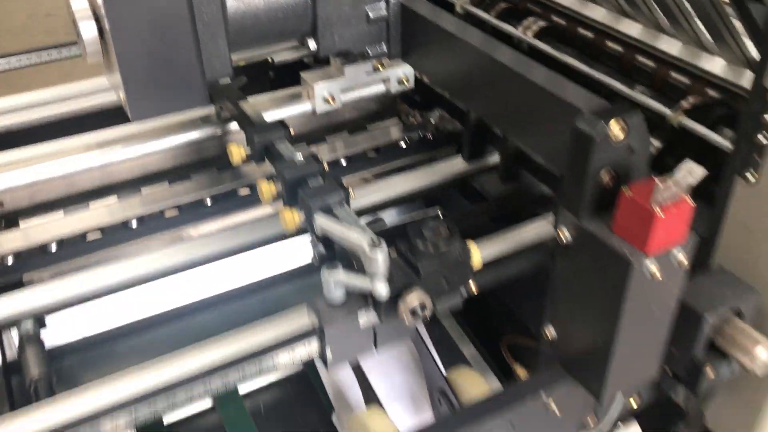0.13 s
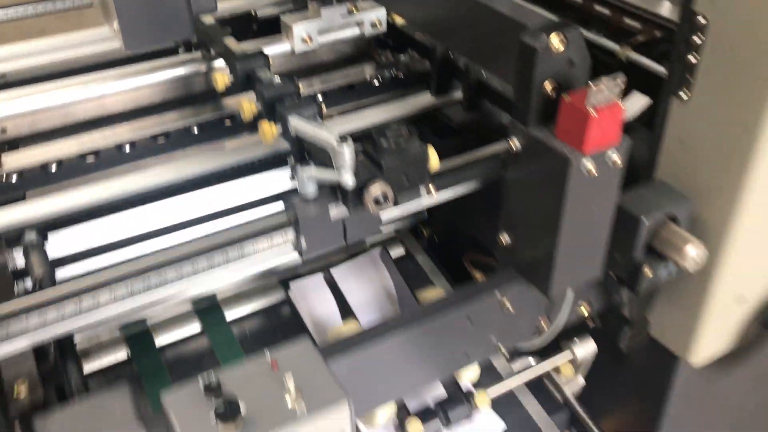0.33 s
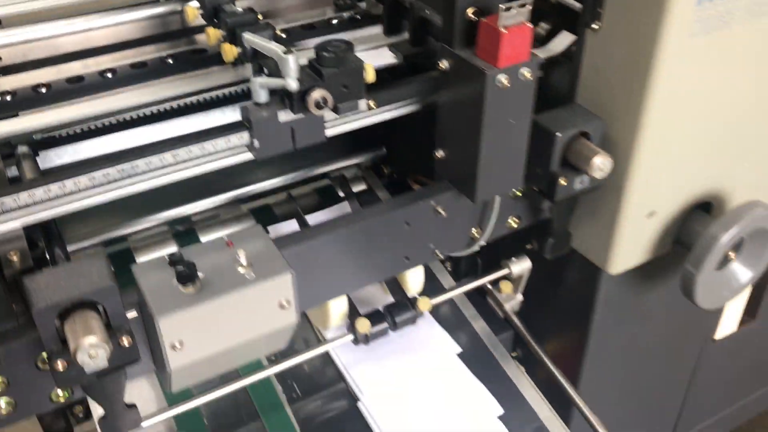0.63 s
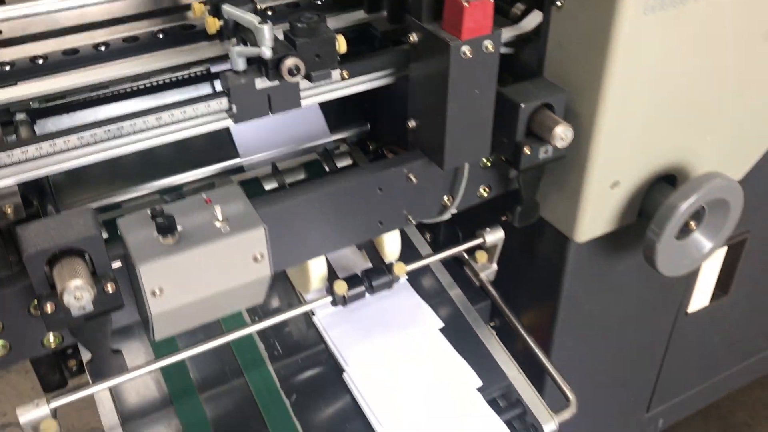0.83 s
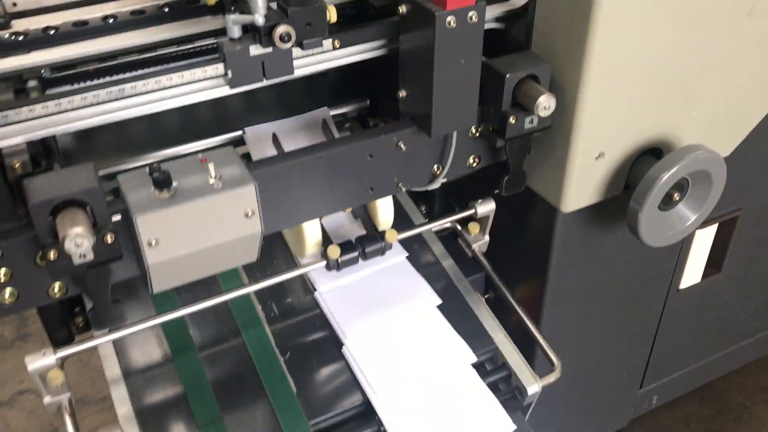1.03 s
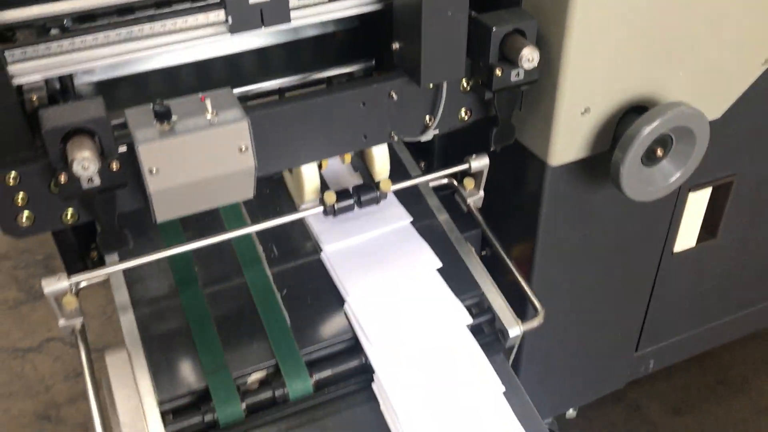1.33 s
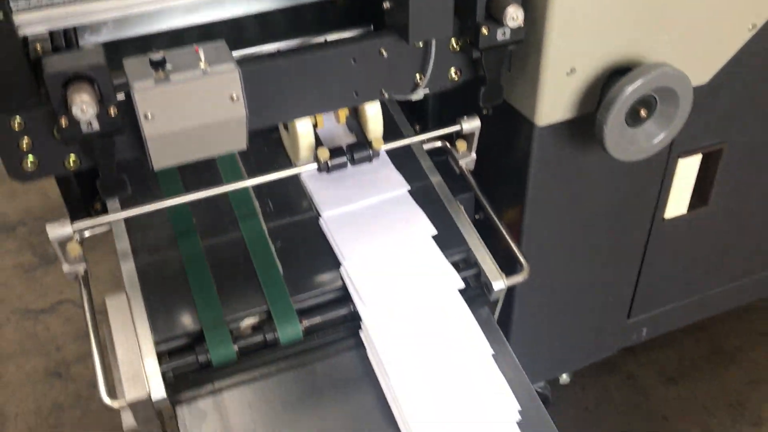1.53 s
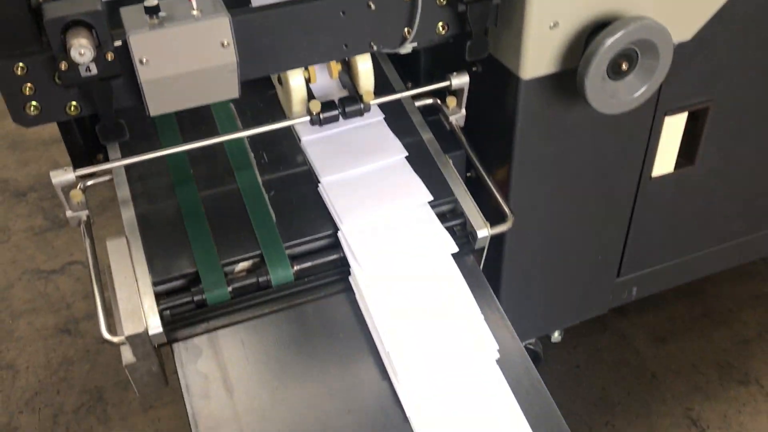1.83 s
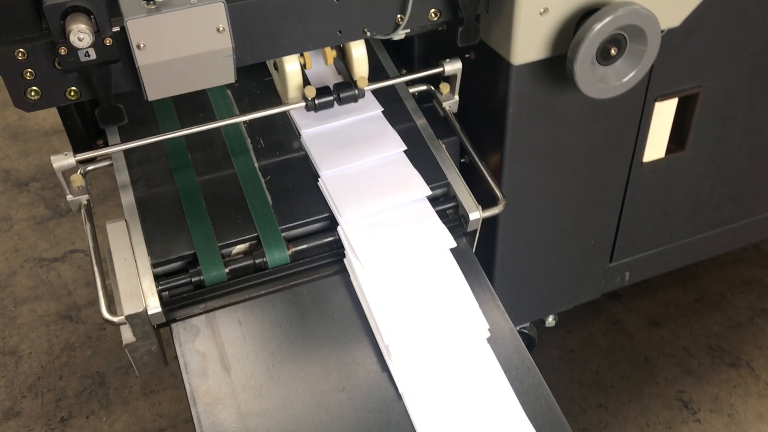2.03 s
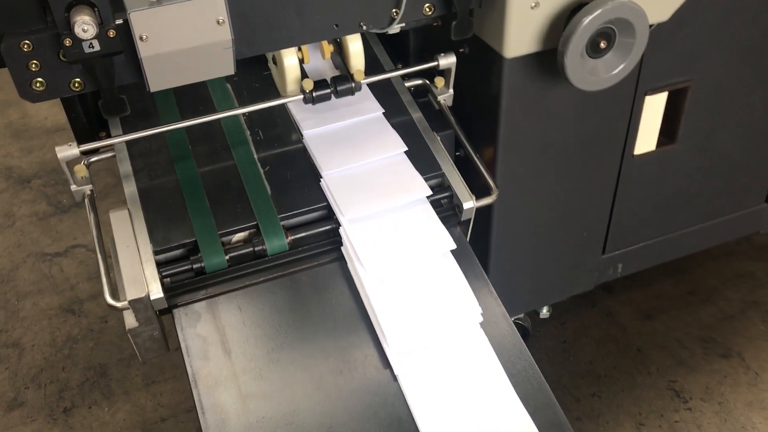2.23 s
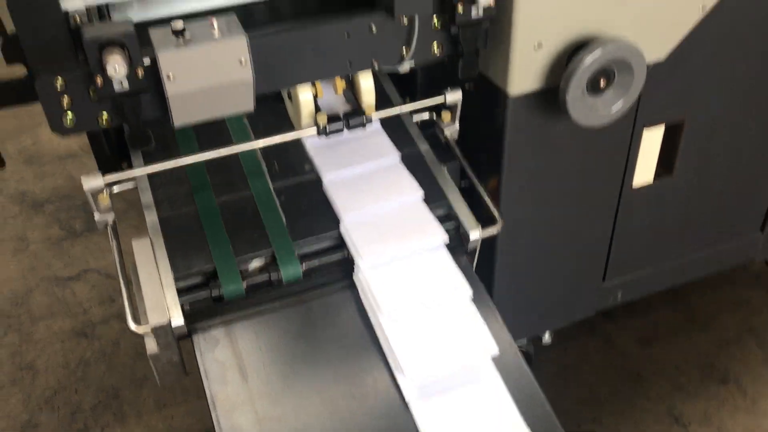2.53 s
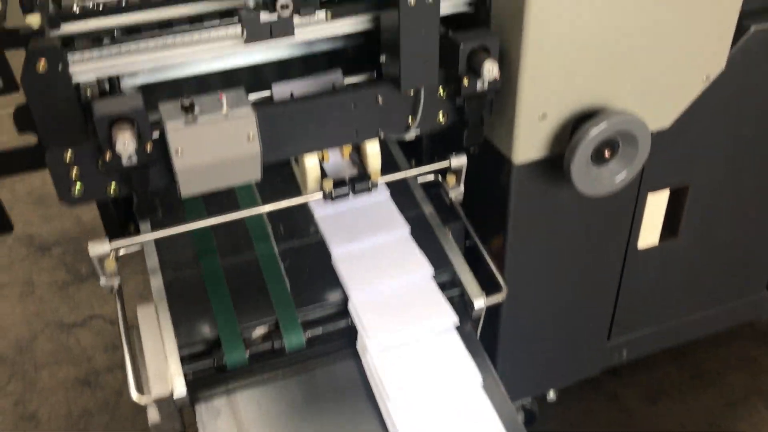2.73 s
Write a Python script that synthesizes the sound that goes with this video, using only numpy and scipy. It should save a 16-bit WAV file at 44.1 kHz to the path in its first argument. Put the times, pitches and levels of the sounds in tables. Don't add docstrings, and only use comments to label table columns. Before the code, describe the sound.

Close whir of a paper folding machine with rhythmic hard knocks, paper slaps and bright metal rattles.

```python
import sys
import numpy as np
from scipy import signal
from scipy.fft import rfft, irfft, next_fast_len
from scipy.io import wavfile
from scipy.ndimage import map_coordinates

SR = 44100
rng = np.random.default_rng(int(sys.argv[2]) if len(sys.argv) > 2 else 0)


def master(y):
    cut = np.clip(np.atleast_2d(y).T, -1, 1)
    pcm = np.round(cut * 32767)
    wavfile.write(sys.argv[1], SR, pcm.astype(np.int16))


def volts_from_db(level):
    exponent = np.asarray(level, float) / 20
    return 10 ** exponent


N = 127449
T = np.arange(N) / SR
CYCLE_S = 0.875
GRAIN_DB = 2.74

# (frequency [Hz], level [dB per Hz])
MOTOR_SPECTRUM = [(18, -51), (30, -19), (97, -4.5), (205, -1), (234, -8.5), (301, 1.5), (465, -11),
                  (510, -3.5), (700, -39), (910, -26), (1540, -120)]
# (frequency [Hz], level [dB per Hz])
ROLLER_SPECTRUM = [(600, -5.5), (900, -4.5), (1250, -7), (1600, -8), (2100, -9), (3000, -9), (5000, -14)]
# (frequency [Hz], level [dB per Hz])
AIR_SPECTRUM = [(4500, -19), (5300, 0), (6300, 3.5), (9000, 1.5), (10500, 1), (12000, 1), (14500, 1),
                (16000, -4)]
# (time [s], rollers [dB], air [dB])
RUNNING_LEVELS = [
    (0, -33, -38.5),
    (1, -35.5, -39.5),
    (2.89, -36.5, -38),
]
# (frequency [Hz], rms level [dB])
GEAR_TONES = [(333.8, -52.5), (500.6, -48.5), (532.9, -46.5), (646.0, -56.5), (802.1, -57.5), (1120, -48),
              (1206, -50), (2046, -52)]
# (time [s], level [dB], frequency [Hz])
FRAME_THUDS = [(.01, -26, 180.8), (.03, -31.5, 123.7), (.25, -34, 120.8), (.35, -24, 175),
               (.55, -24, 175.5), (.58, -26.5, 105), (.85, -29.5, 107.9), (1.27, -27.5, 176.7),
               (1.43, -27, 172.4), (1.74, -26.5, 178), (.61, -28.5, 170.7), (2.66, -30.5, 300),
               (1.499, -29.5, 108), (2.15, -35, 173), (2.33, -25.5, 175), (2.62, -28, 110)]
# (time [s], level [dB], frequency [Hz], t60 [s])
METAL_TAPS = [(.0186, -8, 3430, 0.012), (.0445, -12, 2010, 0.017), (.043, -16, 6800, .015),
              (.332, -15, 1610, .03), (0.331, -11.5, 3300, .03), (0.375, -15.5, 1490, .03),
              (0.45, -12.5, 1183, 0.032), (0.452, -15, 2360, 0.033), (.452, -14, 3000, 0.031),
              (.54, -20.5, 1785, 0.049), (.647, -22.5, 4340, .05), (.647, -19, 7440, 0.053),
              (.677, -19, 11300, .02), (0.707, -27, 4200, .12), (0.741, -19, 8310, 0.085),
              (.752, -24.5, 4200, 0.097), (0.7756, -15, 4460, 0.018), (.851, -18, 3980, .04),
              (0.8998, -11.5, 1480, 0.013), (.923, -15.5, 2200, .035), (.923, -15.5, 3760, .025),
              (1.213, -20, 2450, 0.026), (1.212, -15.5, 3480, .025), (1.256, -17, 1536, 0.029),
              (1.332, -12, 1230, 0.032), (1.332, -19, 2060, .03), (1.334, -14.5, 2565, 0.031),
              (1.532, -23, 7270, .04), (1.655, -16, 4000, 0.014), (1.66, -14, 4650, .012),
              (1.659, -17, 6600, .012), (1.779, -8, 1453, .015), (1.7797, -12, 3130, 0.013),
              (1.804, -16.5, 900, 0.049), (2.089, -14, 2595, 0.034), (2.09, -16, 3200, .025),
              (2.21, -9.5, 1180, 0.024), (2.431, -20, 11300, 0.022), (2.53, -22, 3920, .015),
              (2.533, -22, 5600, .015), (2.5953, -8, 3180, .012), (2.607, -21, 654, 0.056),
              (2.656, -11, 3270, 0.016), (.6965, -17, 8979, .06), (0.6974, -17, 8050, .05),
              (0.742, -19, 5319, 0.038), (.921, -13.5, 12700, .015), (1.722, -15, 14500, 0.014),
              (2.677, -16, 12500, .015), (.7425, -16.5, 7170, .06)]
# (time [s], level [dB], rise [s], fall [s])
SHEET_RUSTLES = [
    (.630, -26, .001, .004),
    (0.638, -11, 0.0085, 0.0095),
    (.676, -23, 0.0006, 0.019),
    (1.521, -18.5, .008, 0.011),
    (1.557, -26, .003, 0.0087),
    (1.668, -18.5, 0.0006, 0.01),
    (2.398, -20.5, 0.0088, 0.012),
    (2.542, -19, .004, 0.012),
]
# (time [s], low mode [dB], high mode [dB], bracket [dB])
PIN_STRIKES = [
    (0.0005, -28, -40, -35),
    (0.8415, -38, -32, -26),
    (0.852, -14, -25, -16.5),
    (0.8589, -17, -7, -17.5),
    (1.7235, -48, -34, -47),
    (1.733, -13, -12, -16.5),
    (2.6065, -22, -15, -23),
]
# (frequency [Hz], t60 [s])
PIN_MODES = [(11858, 0.086), (14450, 0.055)]
# (frequency [Hz], level [dB], t60 [s])
BRACKET_MODES = [(642, -3, .1), (2688, 0, .1), (5140, -8, .1), (7700, -8, .05)]
# (time [s], peak [dB], first favoured mode [Hz], second favoured mode [Hz], hiss [dB])
BAR_RATTLES = [(0.647, -12, 10068, 6165, -11), (0.696, -4, 7060, 10068, -8),
               (0.7416, -6.5, 11190, 10068, -8.5), (0.785, -10.5, 10068, 9265, -1),
               (1.524, -15, 8010, 8010, -13), (1.533, -10, 5280, 8010, -10), (1.5783, -7, 8980, 12440, -8),
               (1.6228, -15, 10068, 8980, -5), (2.413, -16.5, 8010, 6165, -11),
               (2.433, -15, 12440, 11190, -10), (2.4527, -5.5, 10068, 8980, -18),
               (2.454, -5.5, 7060, 12440, -19), (2.4976, -10, 10068, 8980, -9.5)]
# (frequency [Hz], level [dB], t60 [s])
BAR_MODES = [(4180, -16, .09), (5280, -15, .1), (6165, -9, .04), (7060, -9, .085), (8010, -3, .055),
             (8340, -9, .06), (8980, -1, .07), (9265, -7, .08), (10068, 0, .062), (11190, 0, .04),
             (12440, -2, .042), (13570, -3, .035), (14400, -3, .035)]
# (time [s], peak [dB], snap [dB], lowest resonance [dB])
KNIFE_KNOCKS = [
    (0.0189, -6, -10, -6),
    (0.8405, -1.5, -22, 0),
    (0.9, -18, -2, -5),
    (1.7221, -5, -12, 4.5),
    (1.7800, -6, -17, -19),
    (2.5956, -3.5, -22, 1.5),
    (2.6558, -12, -14, -9),
]
# (frequency [Hz], width [Hz], level [dB])
KNIFE_MODES = [(1060, 168, 1), (1530, 130, 1), (2770, 890, 7), (3200, 470, 7)]
# (time [s], peak [dB], low part [dB], bright part [dB])
PAPER_SLAPS = [(0.0024, -12.5, -18, -4), (0.0106, -21, -13, -12), (0.042, -7, -11.5, -5.5),
               (0.1644, -34.5, 6, -5), (0.3312, -4.5, -15, -10.5), (0.3748, -15, -11, -25),
               (0.4494, -9, -8, -16), (0.5344, -30, 2.5, -22), (0.56, -24.5, 3.5, -25),
               (0.774, -21, -27, 6), (0.8514, -10.5, -12, 5), (0.883, -19, -24, 1.5),
               (0.922, -9.5, -9.5, -2.5), (1.2115, -6.5, -18, -7.5), (1.2553, -17.5, -10, -23),
               (1.329, -12.5, -5.5, -27), (1.416, -30.5, 5, -21), (1.6577, -25, -25, 9),
               (1.734, -9.5, -16, -1), (1.7703, -14.5, -20, -15), (1.8035, -16, -2, 3.5),
               (2.0895, -8.5, -13.5, -13), (2.132, -18.5, -10, -27), (2.2087, -14, -3.5, -14),
               (2.5313, -22.5, -44, 6), (2.605, -10.5, -13, -0.5), (2.641, -16.5, -36, -2),
               (2.677, -14.5, -8, 0.5)]
# (frequency [Hz], level [dB per Hz])
PAPER_BODY = [(1300, -4), (2000, 0), (3200, -2.5), (4500, -4.5), (7000, -11)]
# (frequency [Hz], level [dB per Hz])
PAPER_TOP = [(5000, -0.5), (7000, 2), (10500, -0.5), (12500, 2.5), (16000, -4)]
# (frequency [Hz], level [dB])
STOP_PLATES = [(760, -6), (1200, -1), (1460, -9), (1750, -8)]


def rms_one(x):
    return x / np.sqrt(np.mean(x ** 2) + 1e-20)


def coloured(x, spectrum):
    hz, db = np.transpose(spectrum)
    octave = np.log2(np.maximum(np.fft.rfftfreq(N, 1 / SR), 1))
    outside = np.maximum(np.log2(hz[0]) - octave, 0) + np.maximum(octave - np.log2(hz[-1]), 0)
    gain_db = np.interp(octave, np.log2(hz), db) - 24 * outside
    return rms_one(irfft(rfft(x) * volts_from_db(gain_db), N))


def drift(rate_hz):
    count = int(N / SR * 2 * rate_hz) + 3
    return map_coordinates(rng.standard_normal(count), [T * 2 * rate_hz], order=3)


def ring(strikes, hz, t60):
    r = volts_from_db(-60 / (t60 * SR))
    w = 2 * np.pi * hz / SR
    return signal.lfilter([0, np.sin(w)], [1, -2 * r * np.cos(w), r * r], strikes + 1e-18)


def clicks(s, db):
    out = np.zeros(N)
    out[(np.asarray(s) * SR).astype(int)] = volts_from_db(db)
    return out


def swell(s, db, rise, fall):
    t = np.maximum(T - np.asarray(s)[:, None], 0)
    rise, fall = (np.maximum(np.reshape(v, (-1, 1)), .0002) for v in (rise, fall))
    return volts_from_db(np.asarray(db)) @ ((1 - np.exp(-t / rise)) * np.exp(-t / fall))


def crackle():
    grain_db = GRAIN_DB * np.minimum(rng.exponential(1, N), 5)
    return rng.standard_normal(N) * volts_from_db(grain_db + 2.25 * drift(350))


def load(peak_s):
    return np.cos(2 * np.pi * (T - peak_s) / CYCLE_S)


def motor():
    level_db = -36.5 + 2.2 * load(0.53) + 1.3 * drift(5.09)
    return volts_from_db(level_db) * coloured(rng.standard_normal(N), MOTOR_SPECTRUM)


def rollers():
    s, roll_db, _ = np.transpose(RUNNING_LEVELS)
    level_db = np.interp(T, s, roll_db) + 2.5 * load(0.73) + 2.27 * drift(25.02)
    return volts_from_db(level_db) * coloured(rng.standard_normal(N), ROLLER_SPECTRUM)


def air():
    s, _, air_db = np.transpose(RUNNING_LEVELS)
    level_db = np.interp(T, s, air_db) + 1.9 * load(0.73) + 0.55 * drift(52)
    return volts_from_db(level_db) * coloured(rng.standard_normal(N), AIR_SPECTRUM)


def ticks():
    starts = (rng.random(N) < 48 / SR) * volts_from_db(1.3 * rng.standard_normal(N))
    envelope = signal.lfilter([1], [1, -np.exp(-1 / (0.0013 * SR))], starts)
    return volts_from_db(-42) * envelope * coloured(crackle(), PAPER_BODY)


def gears():
    out = np.zeros(N)
    for hz, db in GEAR_TONES:
        level_db = db + 2 * (T - T.mean()) + 2.4 * drift(6)
        phase = 2 * np.pi * np.cumsum(hz + 2.12 * drift(15)) / SR
        out += np.sqrt(2) * volts_from_db(level_db) * np.sin(phase)
    return out


def frame():
    out = np.zeros(N)
    for s, db, hz in FRAME_THUDS:
        t = T - s
        out += swell([s], [db], rise=0.02, fall=0.05) * np.sin(2 * np.pi * hz * t * (1 - 0.4 * t))
    return out


def taps():
    out, t = np.zeros(N + SR), T[:SR // 5]
    for s, db, hz, t60 in METAL_TAPS:
        start = int(s * SR)
        envelope = volts_from_db(db - 60 * t / t60) * (1 - np.exp(-t * hz / 1.57))
        out[start:start + len(t)] += envelope * np.sin(2 * np.pi * hz * t)
    return volts_from_db(2.5 * drift(150)) * out[:N]


def rustles():
    return swell(*np.transpose(SHEET_RUSTLES)) * coloured(crackle(), PAPER_TOP)


def pin():
    s, low_db, high_db, bracket_db = np.transpose(PIN_STRIKES)
    pair = ring(clicks(s, low_db), *PIN_MODES[0]) + ring(clicks(s, high_db), *PIN_MODES[1])
    return pair + sum(ring(clicks(s, bracket_db + g), hz, t60) for hz, g, t60 in BRACKET_MODES)


def bar():
    s, db, first_hz, second_hz, hiss_db = np.transpose(BAR_RATTLES)
    contact_s = 0.0008
    luck = rng.standard_normal((len(s), len(BAR_MODES)))
    pitch = np.log(np.array(BAR_MODES)[:, 0])
    first, second = (abs(pitch - np.log(v)[:, None]).argmin(axis=1) for v in (first_hz, second_hz))
    hiss = swell(s, db + hiss_db - 2.5, rise=0.0005, fall=0.0079) * coloured(crackle(), PAPER_TOP)
    out = hiss.copy()
    for k, (hz, g, t60) in enumerate(BAR_MODES):
        other_db = g - 13 + 4 * np.minimum(luck[:, k], 1)
        level_db = db + np.where(first == k, 0, np.where(second == k, -3.5, other_db))
        strikes = clicks(s + contact_s * abs(luck[:, k - 1]), level_db - 11.5)
        rebounds = clicks(s + 4 * contact_s * abs(luck[:, k - 2]), level_db - 20)
        out += volts_from_db(2.6 * drift(80)) * ring(strikes + rebounds + volts_from_db(g - 31) * hiss, hz, t60)
    return out


def knife():
    s, db, snap_db, deep_db = np.transpose(KNIFE_KNOCKS)
    snap = swell(s + 0.0003, db + snap_db + 0.5, rise=0.0004, fall=0.0034) * coloured(crackle(), PAPER_TOP)
    body = np.zeros(N)
    for k, (hz, width, g) in enumerate(KNIFE_MODES):
        level_db = db + g + deep_db * (k == 0)
        blows = clicks(s, level_db - 16) - clicks(s + 0.00061, level_db - 10)
        body += ring(blows, hz, 2.1 / width)
    return snap + signal.sosfilt(signal.butter(2, 5000, "low", fs=SR, output="sos"), body)


def slaps():
    s, db, low_db, top_db = np.transpose(PAPER_SLAPS)
    db = db - 5
    envelope = swell(s, db, rise=0.0019, fall=0.0082) + swell(s, db - 5, rise=0.00019, fall=0.0011)
    body = envelope * coloured(crackle(), PAPER_BODY)
    plates = rms_one(sum(volts_from_db(g) * ring(crackle(), hz, 0.0056) for hz, g in STOP_PLATES))
    low = swell(s + 0.0015, db + low_db + 7, rise=0.0018, fall=0.0073) * plates
    top = swell(s, db + top_db - 0.5, rise=0.0016, fall=0.0074) * coloured(crackle(), PAPER_TOP)
    return body + low + top


def shop(x):
    t60_s, wall_cut_hz = 0.35, 2400
    size = next_fast_len(N + SR)
    w = 2 * np.pi * np.fft.rfftfreq(size, 1 / SR)
    dull = 1 / (1 + 1j * w / (2 * np.pi * wall_cut_hz))
    response = 0
    for k, delay_s in enumerate(rng.uniform(.006, .03, 10)):
        loop = volts_from_db(-60 * delay_s / t60_s) * dull * np.exp(-1j * w * delay_s)
        response = response + (-1) ** k * loop / (1 - loop)
    return irfft(rfft(x, size) * response, size)[:N]


def scene():
    whir = motor() + rollers() + air() + ticks() + gears()
    hits = taps() + rustles() + pin() + bar() + knife() + slaps()
    hits = signal.sosfilt(signal.butter(2, 240, "high", fs=SR, output="sos"), hits)
    mono = whir + frame() + volts_from_db(-16) * shop(hits) + hits
    return np.array([mono, mono])


def top_cut(x):
    return signal.sosfilt(signal.butter(12, 16790, fs=SR, output="sos"), x)


def record(dry):
    mix = 0.93 * np.tanh(dry / 0.87)
    mix = signal.sosfilt(signal.cheby2(12, 30, 16150, fs=SR, output="sos"), mix)
    mix = signal.sosfilt(signal.butter(3, 39, "high", fs=SR, output="sos"), mix)
    return top_cut(mix)


dry = scene()
out = record(dry)
master(out)
```